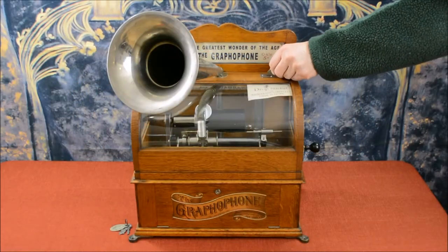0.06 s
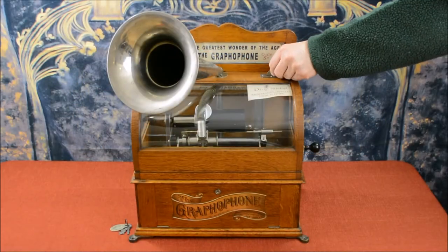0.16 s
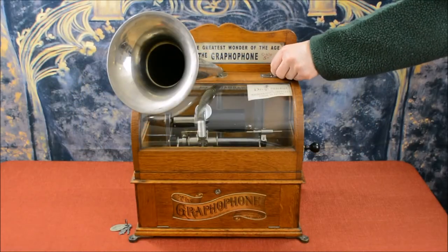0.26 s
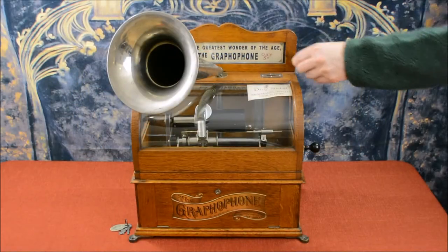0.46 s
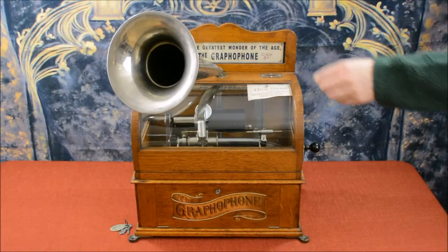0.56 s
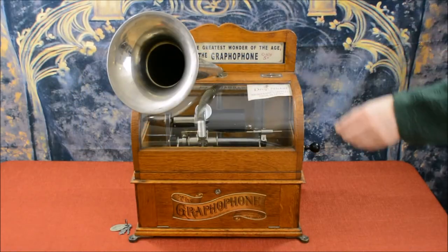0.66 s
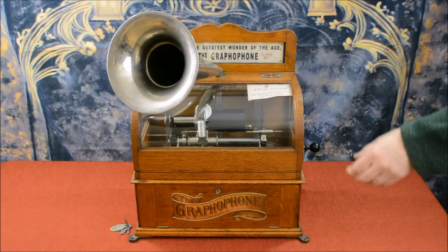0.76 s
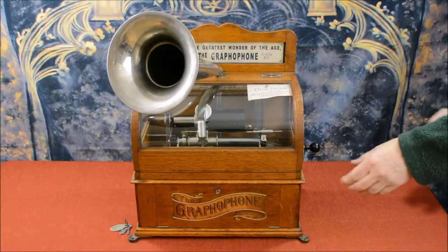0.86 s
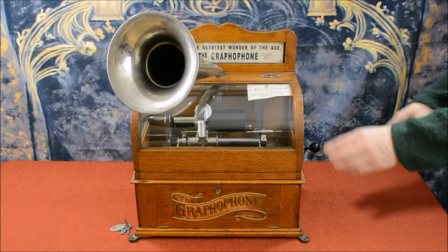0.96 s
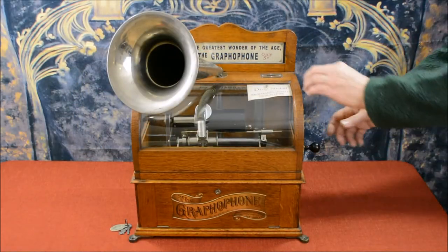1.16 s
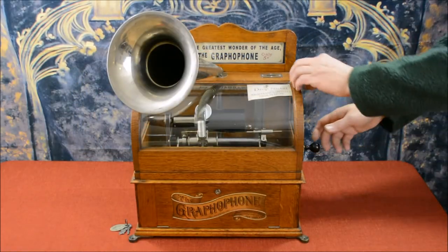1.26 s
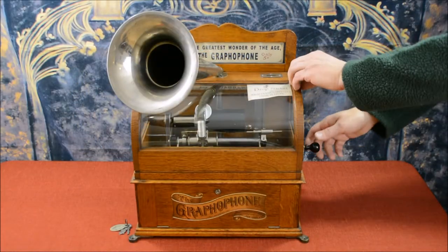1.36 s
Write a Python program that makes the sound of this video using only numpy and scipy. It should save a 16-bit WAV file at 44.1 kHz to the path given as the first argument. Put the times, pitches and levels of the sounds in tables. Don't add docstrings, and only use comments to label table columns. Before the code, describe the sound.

A coin drops through an old wooden machine. Faint scrapes and a clear tick at 0.05-0.08 s, a light tick at 0.2, then a bright ringing slap at 0.24. Loud clacks down a metal chute from 0.32, with a high steel ping at 0.35. Hollow woody landing at 0.49, weakening bounces until 0.66, soft taps to 0.84, then quiet room hiss with a barely audible sleeve movement from 1.0.

```python
import sys
import numpy as np
from scipy import signal
from scipy.io import wavfile
from scipy.ndimage import uniform_filter1d

SR = 44100
rng = np.random.default_rng(int(sys.argv[2]) if len(sys.argv) > 2 else 0)


def waveform_to_disk(signal):
    frames = np.transpose(np.atleast_2d(signal))
    scaled = np.clip(frames, -1, 1) * 32767
    samples = np.round(scaled).astype(np.int16)
    wavfile.write(sys.argv[1], SR, samples)


def gain_from_db(level_db):
    decades = np.asarray(level_db, float) / 20
    return 10 ** decades


N = 61739

# [Hz, dB per Hz]
BOX_CRACK_COLOUR = [(880, -30), (1700, -1.5), (2660, -15.5), (4730, -17.5), (5220, -8), (6240, -15.5),
                    (11200, -17.5), (14500, -34), (16000, -93)]
# [Hz, dB, s to fall 60 dB]
BOX_METAL = [(2910, -18, 0.82), (4140, -20, 0.3), (5350, -2.5, 0.072), (10100, -26, 0.042)]


def evened(x):
    return x / np.sqrt(np.mean(x ** 2) + 1e-20)


def read(points, hz):
    f, value = np.transpose(points)
    return np.interp(np.log(hz + 1), np.log(f + 1), value)


def unit(h):
    return h / np.linalg.norm(h)


def hiss():
    # [Hz, dB per Hz]
    hiss_colour = [(24, -51), (40, -20), (257, -5), (519, -2.5), (1570, -2.5), (1820, -7.5), (2230, -6.5),
                   (10600, -22.5), (16200, -32.5)]
    # [Hz, 1 = the same]
    hiss_likeness = [(60, 1), (240, 0.54), (950, 0.28), (3770, 0.17), (15000, 0.067)]
    level_db, early_db, rise_s, patch_db = -57, -2, 0.6, 1.5
    sleeve_s, sleeve_rise_s, sleeve_db, sleeve_hz = 1, 0.11, 2, 292
    frames, hz = N // 256 + 5, np.fft.rfftfreq(1024, 1 / SR)
    a, b, c, d, patches = rng.standard_normal((frames, 513, 5)).T
    patches = uniform_filter1d(patches, size=8, axis=0)
    patches = evened(uniform_filter1d(patches, size=10, axis=1))
    same = np.clip(read(hiss_likeness, hz), -1, 1)[:, None]
    mid = np.sqrt((1 + same) / 2) * (a + 1j * b)
    side = np.sqrt((1 - same) / 2) * (c + 1j * d)
    gain = gain_from_db(read(hiss_colour, hz)[:, None] + patch_db * patches)
    z = np.array([mid + side, mid - side]) * gain
    moving = np.clip((np.arange(frames) * 256 / SR - sleeve_s) / sleeve_rise_s, 0, 1)
    z = z * gain_from_db(sleeve_db * moving / (1 + (hz[:, None] / sleeve_hz) ** 2))
    noise = evened(signal.istft(z, nperseg=1024, noverlap=768)[1][:, :N])
    early = np.clip(1 - np.arange(N) / SR / rise_s, 0, 1)
    return gain_from_db(level_db + early_db * early) * noise


def room(x):
    # [Hz, s to fall 60 dB]
    room_t60 = [(200, 0.34), (700, 0.35), (2000, 0.34), (5000, 0.26), (10000, 0.12), (15000, 0.28)]
    # [Hz, 1 = the same]
    room_likeness = [(250, 1), (1500, 0.99), (5000, 0.87), (10000, 0.034)]
    gap_s, drift_per_s = 0.0023, 4.995
    hz, t, z = signal.stft(rng.standard_normal((2, 3, 3 * SR // 4)), SR, nperseg=256)
    same = np.clip(read(room_likeness, hz), -1, 1)[:, None]
    mid = np.sqrt((1 + same) / 2) * z[0]
    side = np.sqrt((1 - same) / 2) * z[1]
    fade = gain_from_db(-60 * t / read(room_t60, hz)[:, None])
    tail = signal.istft(np.array([mid + side, mid - side]) * fade, SR, nperseg=256)[1]
    start = np.minimum(np.arange(tail.shape[-1]) / SR / gap_s, 1) ** 2
    tail = tail * start / np.linalg.norm(tail[0, 0])
    turn = 2 * np.pi * (drift_per_s * np.arange(N) / SR + np.linspace(0, 1, 4)[:-1, None])
    feeds = x * np.cos(turn) * np.sqrt(2 / len(turn))
    return signal.fftconvolve(feeds[None], tail, axes=2).sum(1)[:, :N]


def thud():
    start_s, pitch_hz, level_db, rise_s, t60_s = 0.5, 86, -53.5, 0.071, 0.17
    t = np.maximum(np.arange(N) / SR - start_s, 0)
    level = gain_from_db(level_db - 60 * t / t60_s) * (1 - np.exp(-t / rise_s))
    return level * 4 * np.sin(2 * np.pi * pitch_hz * t)


def colour(points):
    hz = np.abs(np.fft.fftfreq(2048, 1 / SR))
    gain = gain_from_db(np.maximum(read(points, hz), -90)) * np.minimum(hz / points[0][0], 1) ** 2
    log_gain = np.log(gain + 1e-5)
    return unit(np.fft.ifft(np.exp(np.conj(signal.hilbert(log_gain)))).real[:1024])


def modes(table):
    rise_s = 0.0011
    t = np.arange(SR // 4) / SR
    hz, db, t60 = np.transpose(table)[:, :, None]
    tones = gain_from_db(db - 60 * t / np.maximum(t60, .005)) * np.sin(2 * np.pi * hz * t)
    return tones.sum(0) * (1 - np.exp(-t / rise_s))


def wood(points):
    # [Hz, s to fall 60 dB]
    wood_t60 = [(250, 0.31), (1000, 0.081), (2500, 0.051)]
    count, panel_db = 90, -5.5
    hz = np.geomspace(points[0][0], 2800, count) * rng.uniform(0.97, 1.02, count)
    t60 = read(wood_t60, hz)
    db = read(points, hz) + 10 * np.log10(hz / t60)
    table = np.transpose([hz * rng.choice([-1, 1], count), db, t60])
    knock = colour(points)
    return gain_from_db(panel_db) * unit(modes(table)) + np.pad(knock, (0, SR // 4 - len(knock)))


def rattle(length, noise):
    rise_share, grit_db = 0.22, 2.5
    u = np.arange(noise.shape[1]) / SR / max(length, .001)
    gritty = noise[0] * gain_from_db(grit_db * noise[1]) / gain_from_db(grit_db)
    return gritty * np.minimum(u / rise_share, 1) * np.exp(-u ** 2)


def ringing(hits, table, ease_s=0.0046, flicker_db=2.5):
    flicker_s, grid_s = 0.0094, 0.004
    s, level_db = np.transpose(hits)
    t = np.arange(N) / SR
    last = np.maximum(np.searchsorted(s, t) - 1, 0)
    hz, db, t60 = np.transpose(table)[:, :, None]
    fall_db = 60 * np.maximum(t - s[last], 0) / np.maximum(t60, .005)
    level = gain_from_db(db + level_db[last] - fall_db) * (t > s[0])
    width = int(ease_s * SR) + 1
    level = uniform_filter1d(level, width, axis=1, origin=(width - 1) // 2)
    coarse = rng.standard_normal((int(N / SR / grid_s) + 2, len(table)))
    smooth = evened(uniform_filter1d(coarse, int(flicker_s / grid_s) + 1, axis=0))
    flicker = np.array([np.interp(t, np.arange(len(v)) * grid_s, v) for v in smooth.T])
    tones = np.sin(2 * np.pi * (hz * t + rng.random(hz.shape)))
    return (level * gain_from_db(flicker_db * flicker) * tones).sum(0)


def strikes(table, crack, panel, ring, board):
    burst_share, dense_db, board_db = 0.4, -8, -7
    board_wet = 0.55
    knock, bright = np.zeros(N + SR), colour(crack)
    noise = rng.standard_normal((len(table), 2, 3000))
    for (s, crack_db, wood_db, _, length), z in zip(table, noise):
        burst, at = rattle(length, z), round(s * SR)
        for db, body in ((crack_db, bright), (wood_db + dense_db, panel)):
            sound = unit(signal.fftconvolve(burst, body)) * np.linalg.norm(body)
            knock[at:at + len(sound)] += gain_from_db(db) * np.sqrt(burst_share * length * SR) * sound
    board_hits = [(row[0], row[2] + board_db) for row in table]
    tones = ringing(board_hits, board, ease_s=0.0021)
    metal = ringing([(row[0], row[3]) for row in table], ring, flicker_db=2)
    return np.array([knock[:N] + board_wet * tones, (1 - board_wet) * tones + metal])


def lever():
    # [s, dB]
    lever_hits = [
        (.338, -42),
        (.352, -30),
        (.405, -41),
        (.43, -47),
        (.455, -41),
        (.49, -43),
    ]
    # [Hz, dB, s to fall 60 dB]
    lever_tone = [(3547, 0, 0.74)]
    return ringing(lever_hits, lever_tone, ease_s=0.0045, flicker_db=0.6)


def coin_tone():
    # [s, dB]
    coin_hits = [
        (.241, -43),
        (.331, -49),
        (.352, -52),
        (.40, -64),
        (.46, -62),
        (.495, -59),
        (.542, -55),
        (.575, -66),
    ]
    # [Hz, dB, s to fall 60 dB]
    coin_pitch = [(13140, 0, 0.16)]
    return ringing(coin_hits, coin_pitch)


def rim_tone():
    # [s, dB]
    rim_hits = [
        (.493, -32.5),
        (.512, -52),
        (.53, -59),
    ]
    # [Hz, dB, s to fall 60 dB]
    rim_pitch = [(10930, -0.5, 0.056)]
    return ringing(rim_hits, rim_pitch)


def coin_in_slot(panel):
    # [s, dB, dB, dB, s]
    slot_hits = [
        (.045, -58, -68, -79, 0.026),
        (.058, -54, -64, -80, 0.02),
        (.0837, -35, -38.5, -49, 0.006),
    ]
    # [Hz, dB per Hz]
    slot_crack = [(880, -23), (1500, -7), (2020, -11.5), (2640, -6), (4000, -8), (4970, -7), (6500, -14.5),
                  (10000, -19), (16000, -52)]
    # [Hz, dB, s to fall 60 dB]
    slot_metal = [(2700, -10, 0.24), (2790, 3, 0.15), (5600, -15, 0.13)]
    slot_board = [(800, -5, 0.036), (1150, -2, 0.061), (1475, -4, 0.072), (2100, -8.5, .06)]
    return strikes(slot_hits, slot_crack, panel, slot_metal, slot_board)


def coin_on_lip():
    # [s, dB, dB, dB, s]
    lip_hits = [
        (.19, -82, -57, -63, 0.0057),
        (.2034, -41.5, -51, -53, 0.011),
        (.236, -63, -48, -55, 0.0098),
        (.2400, -26.5, -28, -25.5, 0.0068),
        (.2435, -24, -36, -47, 0.0046),
    ]
    # [Hz, dB per Hz]
    lip_crack = [(880, -8), (1500, -15.5), (3030, -5.5), (3660, -5), (5600, -12.5), (8490, -6.5),
                 (12400, -19.5), (13500, -28), (16000, -47)]
    lip_wood = [(150, -52), (250, -40), (673, 3), (986, -2), (1580, 3), (1980, -31), (2600, -30),
                (3380, -18), (5720, -120)]
    # [Hz, dB, s to fall 60 dB]
    lip_metal = [(2995, -19, 0.17), (3696, 3, 0.35), (4990, -4, 0.076), (5180, -16, 0.2),
                 (8200, -22, 0.074), (10150, -14, 0.088)]
    lip_board = [(400, -12, .1), (620, -5, .08), (700, -8, .15), (1125, -4, .12), (1567, 0, .08),
                 (1780, -2, .08), (2450, -5, .06)]
    return strikes(lip_hits, lip_crack, wood(lip_wood), lip_metal, lip_board)


def coin_down_chute(panel):
    # [s, dB, dB, dB, s]
    chute_hits = [
        (.317, -25, -31, -52, 0.0076),
        (.321, -32.5, -36.5, -50, 0.0068),
        (.3247, -24.5, -34.5, -54, 0.0022),
        (.328, -18.5, -22, -57, 0.0026),
        (.334, -36, -29, -54, 0.016),
        (.349, -31.5, -31, -29, 0.01),
        (.36, -39.5, -42.5, -39.5, 0.0066),
        (.38, -45, -45, -42.5, 0.031),
        (.444, -45.5, -44, -48, 0.017),
        (.455, -44, -71, -49, 0.016),
    ]
    # [Hz, dB per Hz]
    chute_crack = [(880, -54), (1750, 1.5), (2000, -5), (2400, -15), (3500, 6.5), (3960, -6), (6760, -7),
                   (7390, -2.5), (16000, -24.5)]
    # [Hz, dB, s to fall 60 dB]
    chute_metal = [(1457, -18, 0.2), (3700, -17, 0.09), (4113, -8, 0.16), (4188, -7, 0.25), (5313, -17, .3),
                   (6132, -10, 0.17), (6417, -16, .15), (7400, -9, 0.06), (8656, -9, 0.1), (8990, -15, .12),
                   (9340, -3, 0.14), (9685, -16, .1), (10150, -2, 0.08), (15700, -22, 0.09)]
    chute_board = [(345, -16, .12), (506, -5, .1), (770, -5, .07), (921, -12, .12), (1100, 0, .07),
                   (1480, -9, .15), (1570, -3, .06), (1700, -1, .05), (1900, -4, .04), (2083, -11, .1),
                   (2304, -11, .12)]
    return strikes(chute_hits, chute_crack, panel, chute_metal, chute_board)


def coin_in_box(panel):
    # [s, dB, dB, dB, s]
    box_hits = [(.487, -36, -38.5, -64, 0.01), (.4905, -37, -23.5, -32, 0.0058),
                (.496, -31.5, -20, -34.5, 0.0099), (.503, -31, -42, -35, 0.0049),
                (.511, -36, -30, -61, 0.0084), (.522, -36.5, -33.5, -38, 0.011),
                (.534, -40.5, -56, -51, 0.0096), (.545, -52, -51, -33.5, 0.02),
                (.555, -44, -36.5, -61, 0.0043), (.569, -51, -61, -41, .012),
                (.598, -46.5, -40.5, -47, 0.014), (.615, -55.5, -43, -72, 0.026),
                (.634, -47, -36, -65, 0.0047), (.648, -64, -52, -42.5, 0.0041),
                (.663, -70, -45.5, -58, 0.0069)]
    # [Hz, dB, s to fall 60 dB]
    box_board = [(290, -15, .08), (398, -13, .1), (507, -2, .07), (727, -8, .1), (835, 0, .06),
                 (925, -8, .12), (1048, 0, .11), (1085, -6, .12), (1480, -4, .06), (1637, -5, .07),
                 (1733, -9, .1), (1890, -9, .07), (2250, -9, .07)]
    return strikes(box_hits, BOX_CRACK_COLOUR, panel, BOX_METAL, box_board)


def coin_settles(panel):
    # [s, dB, dB, dB, s]
    settle_hits = [
        (.735, -57, -38.5, -60, 0.011),
        (.765, -77, -45.5, -77, 0.022),
        (.795, -74.5, -48.5, -80, 0.017),
        (.84, -81, -54, -77, 0.023),
    ]
    # [Hz, dB, s to fall 60 dB]
    settle_board = [(531.4, -0.5, 0.069), (772, -2.5, 0.045), (934, -20, 0.059), (1046.5, -1, 0.16),
                    (1100, -8, 0.13), (1644, 0.5, 0.038)]
    return strikes(settle_hits, BOX_CRACK_COLOUR, panel, BOX_METAL, settle_board)


def scene():
    # [Hz, dB per Hz]
    upper_wood = [(180, -13.5), (300, -20.5), (505, -11), (750, -5), (1100, -3), (1300, 1.5), (1650, -7),
                  (2300, -9.5), (3200, -37.5)]
    box_wood = [(230, -19.5), (400, -18), (505, -5), (620, -2.5), (830, 0), (1060, 2.5), (1260, -8),
                (1700, -5.5), (2350, -31), (3200, -43)]
    low_cut_hz, air_cut_hz = 156, 14000
    pan_db, room_db, ring_to_room_db = 0.15, -2.5, -19
    upper, box = wood(upper_wood), wood(box_wood)
    path = coin_in_slot(upper) + coin_on_lip() + coin_down_chute(upper)
    knock, ring = path + coin_in_box(box) + coin_settles(box)
    ring = ring + lever() + coin_tone() + rim_tone()
    knock = signal.sosfilt(signal.butter(3, low_cut_hz, "high", fs=SR, output="sos"), knock)
    knock = signal.sosfilt(signal.butter(6, air_cut_hz, fs=SR, output="sos"), knock)
    knock = knock + thud()
    direct = (knock + ring) * gain_from_db(np.array([[pan_db], [-pan_db]]))
    echo = gain_from_db(room_db) * room(knock + gain_from_db(ring_to_room_db) * ring)
    return direct + echo + hiss()


def band_limit(x):
    return signal.sosfilt(signal.butter(12, 16360, fs=SR, output="sos"), x)


def record(dry):
    edge = signal.firwin(255, 16050, window=("kaiser", 9), fs=SR)
    mix = signal.oaconvolve(dry, edge[None], "same")
    return band_limit(mix)


dry = scene()
out = record(dry)
waveform_to_disk(out)
```